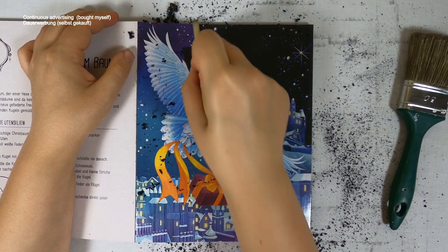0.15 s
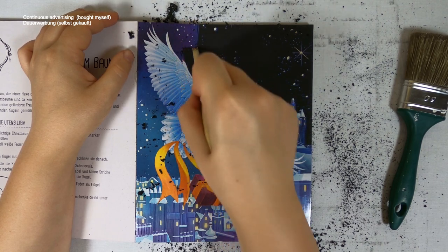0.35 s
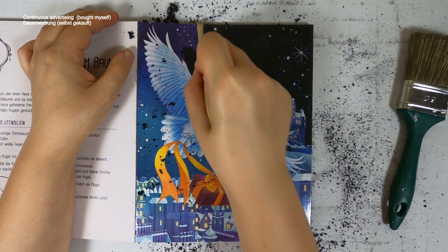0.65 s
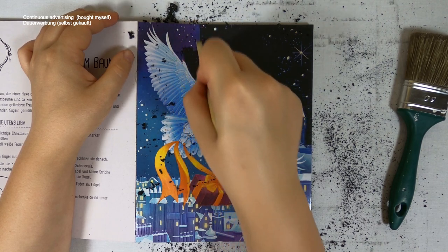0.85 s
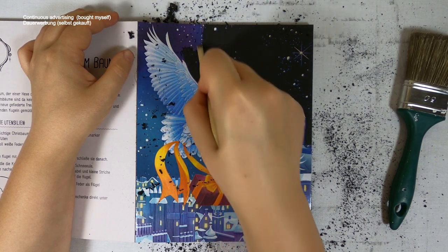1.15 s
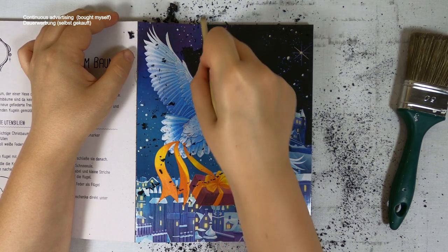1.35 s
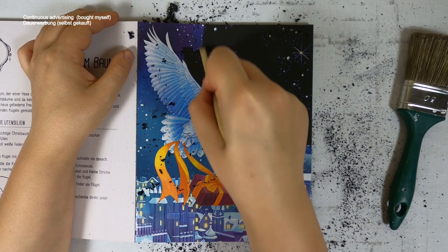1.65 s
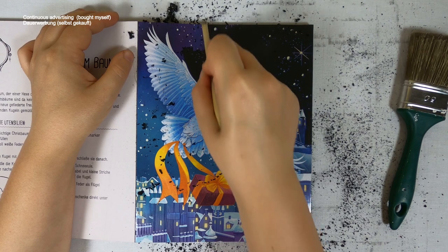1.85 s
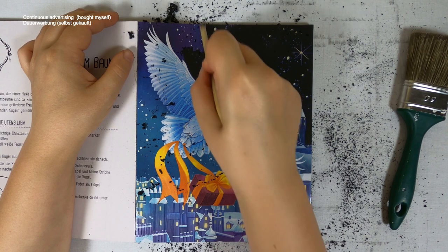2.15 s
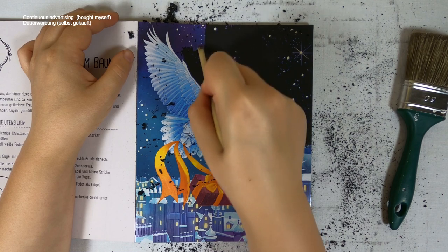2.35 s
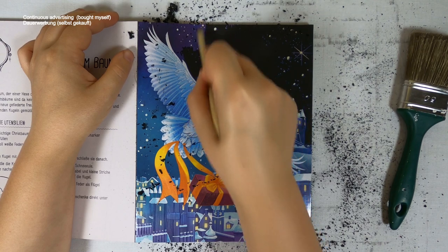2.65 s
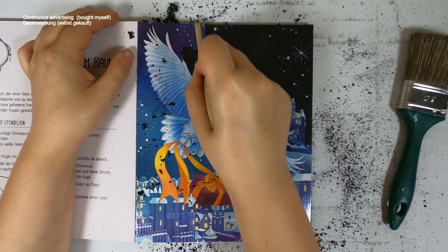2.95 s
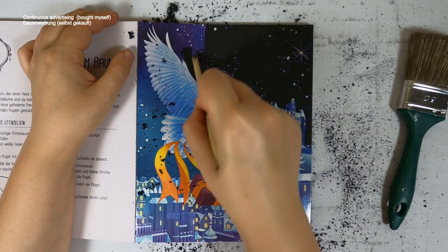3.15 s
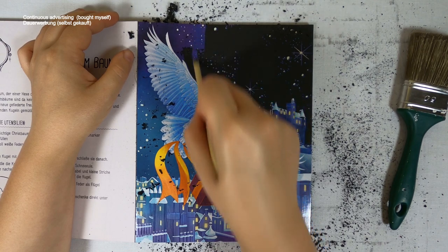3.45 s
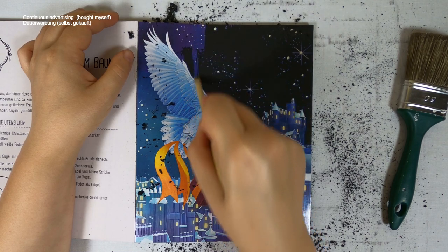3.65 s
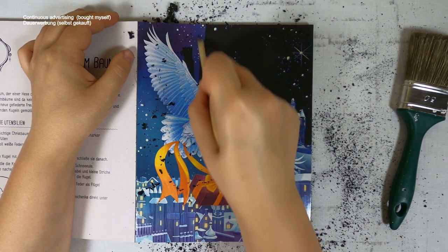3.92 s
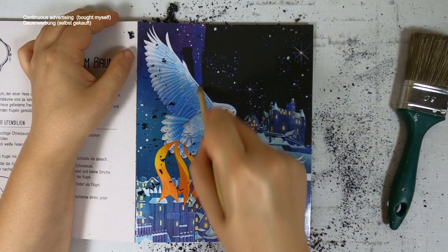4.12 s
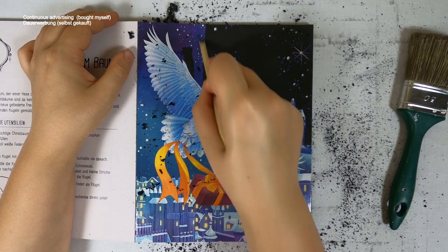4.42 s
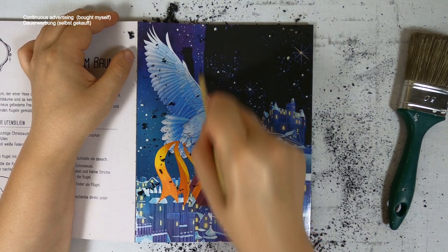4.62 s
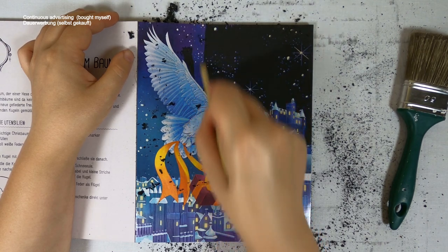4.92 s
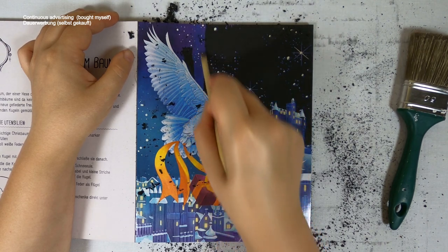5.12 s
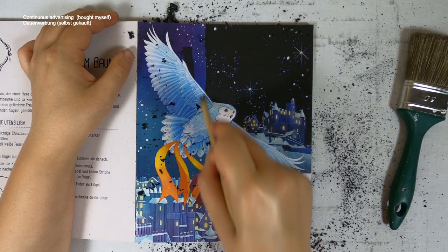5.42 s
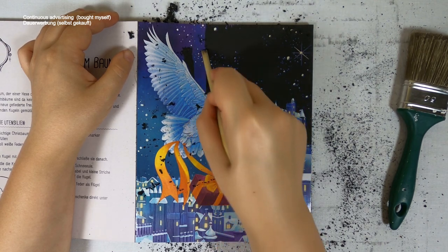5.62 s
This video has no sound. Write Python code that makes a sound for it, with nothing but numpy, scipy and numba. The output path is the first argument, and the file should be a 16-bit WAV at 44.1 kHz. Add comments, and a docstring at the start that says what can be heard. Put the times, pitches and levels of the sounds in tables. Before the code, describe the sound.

A wooden tip scrapes coating from a card page on a desk, close to a stereo microphone in a small room. Quick to-and-fro scratches rasp and chatter for two seconds, sink to faint touches, then return firmer and slower, with snapping catches, fine hiss and soft hand bumps beneath.

```python
"""Scratching a coated card

A wooden stylus scrapes the black coating off a card page on a desk, in quick strokes to and fro, in a small room.
In each stroke the tip grazes the page, and often bites into the coating, chattering at a gliding pitch; slips
of the tip and crumbling flakes feed a card ring, a rasp and a fine hiss, with sharp catches on top.
Below lie soft desk thuds and bumps from the hand, a deep rumble that comes and goes, and still air."""
import sys
import numpy as np
from scipy import signal
from scipy.fft import rfft, irfft, next_fast_len
from scipy.io import wavfile
from scipy.ndimage import uniform_filter1d
from numba import njit

SR = 44100
rng = np.random.default_rng(int(sys.argv[2]) if len(sys.argv) > 2 else 0)


def output_pcm(signal):
    """Save a mono or channel-first signal as 16-bit PCM at the path in sys.argv[1].

    Samples are clipped to [-1, 1] before scaling.
    """
    pcm = np.clip(np.atleast_2d(signal).T, -1, 1) * 32767
    wavfile.write(sys.argv[1], SR, np.round(pcm).astype(np.int16))


N = 254898
TIME = np.arange(N) / SR
# Filters work on a longer, silence-padded stretch, so that tails do not wrap round.
SIZE = next_fast_len(N + SR // 2, real=True) // 2 * 2
HZ = np.arange(SIZE // 2 + 1) * SR / SIZE

# Grazes from one turn of the hand to the next, before the layers' own trims:
# turn_s [s], level_db [dB], brightness_db [dB, added to rasp and hiss]
STROKES = [(-0.03, -73, -0.5), (0.116, -53, 5), (0.29, -53, 4), (0.512, -44.5, -3.5), (0.691, -49.5, 0),
           (0.91, -43.5, 1), (1.078, -47, 0), (1.303, -49.0, -3), (1.479, -52, 0), (1.726, -48.5, 4),
           (1.897, -55.5, 2.5), (2.126, -54.5, -4.0), (2.3, -69, 2), (2.461, -62.5, 4), (2.66, -83.5, 0.0),
           (2.852, -63.0, 6.5), (3.03, -61.0, 2), (3.269, -57, 5), (3.41, -60.5, 0.5), (3.705, -52.5, 12.5),
           (3.978, -58, -3), (4.276, -41.5, -7.5), (4.569, -63, 6), (4.864, -42.5, -6.5), (5.16, -55.5, 5),
           (5.464, -42, -9)]
# Bites of the tip into the coating, before the layers' own trims:
# start_s, end_s [s], level_db, swell_db (rise from start to end), rasp_db, hiss_db [dB],
# first_hz, middle_hz, last_hz [Hz, chatter pitch at start, middle and end]
BITES = [(-.01,0.038,-42.5,0.5,-10,-16.5,1320,1150,680), (0.12,0.181,-36,8.5,-11.5,-25.5,920,750,840),
         (0.334,0.382,-39.5,1,-10,-15.5,1600,1900,1400), (0.396,.435,-44,7.5,-10.5,-18,1960,1200,650),
         (0.517,0.567,-35.5,4,-12,-28,1130,890,1860), (0.743,0.836,-39.5,-1,-12,-18.5,2710,1550,570),
         (0.92,.982,-34,1.5,-13,-31,940,760,1330), (1.143,1.233,-39,-8.5,-10.5,-17.5,2570,1200,670),
         (1.307,1.322,-39,-19,-17,-25.5,1070,870,1100), (1.356,1.424,-48,-3,-10.5,-21.5,1320,1200,1200),
         (1.538,1.637,-42.5,0.5,-11,-17.5,2470,2050,690), (1.729,1.794,-32,2,-13,-27.5,1140,810,890),
         (1.941,1.972,-42.5,1,-9,-15,2330,2350,1150), (2.013,2.051,-43.5,2.5,-13.5,-20,1170,1200,520),
         (2.131,2.134,-36.5,5,-15,-25,1400,1400,1400), (2.168,2.229,-46.5,-3.5,-9,-22.5,1270,1330,1000),
         (2.34,2.403,-60.5,-4,-11.5,-16.5,1190,1040,900), (2.467,2.52,-55,-9,-20,-28,900,1030,920),
         (2.675,2.77,-63,-2,-5,-9.5,1510,800,900), (2.781,2.81,-53.5,-3,-9,-15.5,1500,1130,680),
         (2.864,2.895,-49.5,7,-19,-31,970,1000,800), (2.964,2.982,-65,-1,-4.5,-13,1200,1400,990),
         (3.027,3.06,-58,19,-6.5,-12.5,900,440,590), (3.137,3.198,-38.5,5.5,-12,-19.5,1930,1440,670),
         (3.273,3.31,-33.5,2.5,-16,-28,885,810,900), (3.49,3.628,-35,7.5,-11,-19,1840,880,785),
         (3.707,3.794,-33.5,10,-15.5,-34.5,830,830,880), (3.793,3.858,-31.5,-1,-10,-28,910,780,1060),
         (4.048,4.186,-36.5,12.5,-9.5,-17.5,1840,880,750), (4.33,4.361,-33,-4,-11,-24,1090,880,1300),
         (4.361,4.44,-33.5,0.5,-7.5,-25,2100,1900,1900), (4.638,4.697,-45,7,-8,-15,1420,1040,860),
         (4.727,4.792,-53,-2.5,-12.5,-17,850,740,950), (4.927,5.004,-37,-5,-8.5,-21.5,1260,3800,2000),
         (5.007,5.069,-36,-2.5,-7.5,-26,2900,1900,890), (5.204,5.327,-36,6,-10,-18,1620,850,750),
         (5.535,5.577,-35.5,-3,-14.5,-26.5,2400,4200,2900), (5.584,5.618,-43,0,-5.5,-20,1090,980,1700),
         (5.619,5.681,-34.5,0,-9,-26,2620,2130,860)]


def from_db(db):
    """Turns decibels into a plain gain."""
    return 10 ** (np.asarray(db) / 20)


def rms_one(x):
    """Scales a signal to an average strength (RMS) of 1."""
    return x / np.sqrt(np.mean(x ** 2) + 1e-20)


def evened(x, span_s):
    """Holds the running level near 1 and keeps the grain that is finer than the span."""
    power = np.mean(np.atleast_2d(x) ** 2, axis=0)
    size = max(int(span_s * SR), 8)
    smooth_power = uniform_filter1d(uniform_filter1d(power, size), size)
    return x / np.sqrt(np.abs(smooth_power) + 1e-12)


def in_time(rows):
    """Joins each column of (time in s, values ...) rows by straight lines."""
    s, *columns = np.transpose(sorted(map(tuple, rows)))
    return [np.interp(TIME, s, column) for column in columns]


def at_hz(points, hz):
    """Reads a curve of (Hz, value) points, with straight lines on a logarithmic pitch scale."""
    f, value = np.transpose(points)
    return np.interp(np.log(hz + 1), np.log(f), value)


def filtered(x, gain):
    """Multiplies each frequency by its gain."""
    return irfft(rfft(x, SIZE) * gain, SIZE)[..., :N]


def coloured(x, db):
    """Gives each frequency its level with a filter that never sounds early (minimum phase)."""
    cepstrum = irfft(np.log(from_db(db)), SIZE)
    cepstrum[1:SIZE // 2] *= 2
    cepstrum[SIZE // 2 + 1:] = 0
    return filtered(x, np.exp(rfft(cepstrum)))


def spread(pair):
    """Two unrelated signals become left and right, alike in the bass and less so in the treble."""
    # Left-right likeness: pitch_hz [Hz], likeness [0 to 1]
    likeness = [(100, .86), (700, .96), (1400, .95), (3100, .85), (6800, .65), (14000, .45)]
    alike = np.clip(at_hz(likeness, HZ), 0, .999)
    shared = filtered(pair[0], np.sqrt(1 + alike))
    opposed = filtered(pair[1], np.sqrt(1 - alike)) * [[1], [-1]]
    return shared + opposed


def noise(spectrum):
    """Steady stereo noise with the given spectrum and an RMS of 1."""
    return rms_one(coloured(spread(rng.standard_normal((2, N))), at_hz(spectrum, HZ)))


def still_air():
    """The quiet room's air is a faint steady noise."""
    # Spectrum of the air: pitch_hz [Hz], level_db [relative dB]
    air_spectrum = [(12, -28), (20, -36), (92, -44), (166, -4), (534, -9), (725, -5.5), (811, -34),
                    (1040, -9.5), (1870, -19.5), (5380, -28.5), (6540, -26.5), (12400, -33), (15500, -85)]
    return from_db(-68.5) * noise(air_spectrum)


def rumble():
    """A deep noise swells and sinks below the scraping."""
    # Spectrum of the rumble: pitch_hz [Hz], level_db [relative dB]
    rumble_spectrum = [(12, -7), (30, 31.5), (50, 20), (80, -3), (130, -51)]
    # Rumble over time, before the trim below: time_s [s], level_db [dB]
    rumble_level = [(0.0, -59), (0.42, -71), (0.53, -63), (0.61, -86), (0.64, -55.5), (0.85, -81),
                    (1.01, -53), (1.27, -90), (1.45, -59), (1.72, -88), (1.82, -65), (2.62, -76),
                    (2.7, -54), (2.77, -73), (4.41, -78), (4.46, -60), (4.64, -79), (5.78, -85)]
    level_db = in_time(rumble_level)[0] - 2.1
    return from_db(level_db) * evened(noise(rumble_spectrum), span_s=0.073)


def thuds(arch):
    """The hand's weight makes the desk thud softly: low noise that swells with each stroke."""
    # Spectrum of the thudding: pitch_hz [Hz], level_db [relative dB]
    thud_spectrum = [(60, -18.5), (105, -31.5), (140, -8.5), (168, 2.5), (205, -17), (300, -2.5),
                     (380, -17.5), (600, -49.5)]
    # Thudding at the height of a stroke: time_s [s], level_db [dB]
    hand_weight = [(0, -60.5), (1.8, -59), (2.35, -69), (3.2, -62), (4.2, -65.5), (5.78, -64.5)]
    share_at_turn = 0.29  # of the gain, which stays while the hand turns
    swell = share_at_turn + (1 - share_at_turn) * arch
    return from_db(in_time(hand_weight)[0]) * swell * evened(noise(thud_spectrum), span_s=0.086)


def bumps(soft_s):
    """The soft edge of the hand sets the desk's low modes ringing."""
    # Bumps of the hand: time_s [s], level_db [dB, before the modes' own levels]
    hand_bumps = [(0.144, -58), (0.222, -48.5), (0.413, -58), (.625, -51), (0.836, -60), (1.008, -45.5),
                  (1.13, -46.5), (1.408, -48), (1.528, -52.5), (1.761, -52.5), (1.841, -52), (1.952, -56),
                  (2.06, -66), (2.141, -62), (2.467, -62), (2.59, -61), (2.705, -57), (2.974, -62),
                  (3.057, -52), (3.83, -49), (4.435, -47.5), (4.885, -59), (5.661, -60)]
    # Ringing modes of the desk: pitch_hz [Hz], level_db [relative dB], t60_s [s to fall by 60 dB]
    desk_modes = [(71.5, -7.5, 0.11), (147, 4, 0.17), (169.9, 6, 0.21), (311.5, -0.5, 0.13)]
    t = TIME[:SR // 3]
    blows = np.zeros(N)
    for s, db in hand_bumps:
        blows[round(s * SR)] = from_db(db)
    ring = sum(from_db(db - 60 * t / t60) * np.sin(2 * np.pi * hz * t) for hz, db, t60 in desk_modes)
    soft_onset = 1 - np.exp(-t / soft_s)
    return signal.fftconvolve(blows, ring * soft_onset)[:N]


def desk(arch):
    """Thuds in step with the strokes, the deep rumble and the hand's bumps add up."""
    return thuds(arch) + rumble() + bumps(soft_s=0.011)


def unit_energy(echoes):
    """Scales the echoes of each side to a total energy of 1."""
    return echoes / np.sqrt(np.sum(echoes ** 2, axis=1, keepdims=True))


def room(x, first_s, treble_db):
    """Dense reflections, less alike at the two sides towards the treble, die away quickly."""
    level_db, t60_s = -9, 0.22
    t = TIME[:SR // 2]
    dense = spread(rng.standard_normal((2, N)))[:, :len(t)]
    echoes = unit_energy(dense * from_db(-60 * t / t60_s) * (t > first_s))
    wet = signal.fftconvolve(x, echoes, axes=1)[:, :N]
    return coloured(wet, level_db + at_hz([(1200, 0.011), (6000, treble_db)], HZ))


def glances(x, decay_s, level_db):
    """Treble glances off the desk and the hand within a few milliseconds, which combs it finely."""
    t = TIME[:SR // 50]
    echoes = unit_energy(rng.standard_normal((2, len(t))) * np.exp(-t / decay_s))
    reflected = signal.fftconvolve(x, echoes, axes=1)[:, :N]
    return x + coloured(reflected, level_db + at_hz([(1200, -18), (4500, 0)], HZ))


def grazes():
    """Each stroke rises and falls in one early-peaking arch; returns it and the gains of ring, rasp and hiss."""
    last_turn_s = 5.793
    skew, steepness = 0.65, 1.93
    rasp_db, hiss_db = -12, -18.5  # beside the card's ring
    turns, level_db, bright_db = np.transpose(STROKES)
    stroke = np.clip(np.searchsorted(turns, TIME, "right") - 1, 0, None)
    length_s = np.diff(turns, append=last_turn_s)
    progress = np.clip((TIME - turns[stroke]) / length_s[stroke], 0, 1)
    arch = np.abs(np.sin(np.pi * progress ** skew)) ** steepness
    layers_db = level_db + np.array([0 * bright_db, bright_db + rasp_db, bright_db + hiss_db])
    shapes = np.array([arch, arch, arch ** 0.82])  # the hiss has a flatter arch
    return arch, shapes * from_db(layers_db)[:, stroke]


def bites():
    """Each bite sets in quickly, swells or fades evenly and lets go; returns the gains of ring, rasp and hiss."""
    attack_s, release_s = 0.013, .012
    power = np.zeros((3, N))
    for start, end, level_db, swell_db, rasp_db, hiss_db, *_ in BITES:
        near = slice(*np.searchsorted(TIME, [start, end + 10 * release_s]))
        t = TIME[near]
        progress = np.clip((t - start) / (end - start), 0, 1)
        hold = from_db(level_db + swell_db * (progress - .5))
        attack = np.minimum((t - start) / attack_s, 1)
        release = np.exp(-np.maximum(t - end, 0) / release_s)
        gain = hold * attack * release
        power[:, near] += (from_db([[0], [rasp_db], [hiss_db]]) * gain) ** 2
    return np.sqrt(power)


def chatter_pitch():
    """The chatter has one set pitch at every turn and glides through three pitches in each bite."""
    turn_hz = 780
    points = [(turn, turn_hz) for turn, *_ in STROKES]
    for start, end, *_, first_hz, middle_hz, last_hz in BITES:
        points += [(start, first_hz), ((start + end) / 2, middle_hz), (end, last_hz)]
    return np.exp(in_time([(s, np.log(hz)) for s, hz in points])[0])


def slips(median_gap_s, uneven, size_db):
    """Stick and slip: clicks at uneven gaps, on the whole larger the longer the tip has stuck."""
    draws = rng.standard_normal((6000, 2))
    stuck = np.exp(uneven * draws[:, 0])
    at = (np.cumsum(stuck) * SR * median_gap_s).astype(int)
    size = np.sqrt(stuck) * from_db(size_db * draws[:, 1])
    inside = at < N
    return np.bincount(at[inside], size[inside], N)


def crumbs(slip, burst_s, steady):
    """Countless flakes of coating break off, most strongly just after each slip."""
    burst = rms_one(signal.lfilter([1], [1, -np.exp(-1 / (burst_s * SR))], slip))
    return rms_one(spread(rng.standard_normal((2, N)) * (steady + burst)))


@njit
def gliding_ring(x, hz, q, sr):
    """A resonance whose centre moves; its gain is 1 at the centre."""
    out, band, low = np.zeros(len(x)), 0., 0.
    for i in range(len(x)):
        g = np.tan(np.pi * hz[i] / sr)
        v = (band + g * (x[i] - low)) / (1 + g * (g + 1 / q))
        band, low = 2 * v - band, low + 2 * g * v
        out[i] = v / q
    return out


def chatter(slip, grit, pitch_hz, grit_share):
    """Slips and flakes keep the tip shaking steadily at a rough, gliding pitch."""
    push = rms_one(signal.lfilter([1, -1], [1, -.98], slip)) + grit_share * grit
    ring = np.array([gliding_ring(side, pitch_hz, q=4., sr=SR) for side in push])
    return evened(ring, span_s=.008)


def catches(rise_s, crack_db, crack_s):
    """The tip catches and snaps free: a short swell of the card's ring and a crack of breaking coating."""
    # Catches: time_s [s], level_db [dB], pitch_hz [Hz]
    hard_catches = [(0.022, -33.5, 1008), (0.133, -39, 770), (0.337, -51, 1130), (0.421, -33.5, 1130),
                    (0.524, -28, 1040), (0.542, -27, 1010), (0.748, -41.5, 1080), (0.919, -30, 1040),
                    (1.742, -25, 962), (2.131, -39.5, 1250), (2.186, -34, 1056), (3.157, -32.5, 1090),
                    (3.176, -32, 1010), (3.306, -24.5, 953), (3.562, -27, 1010), (3.717, -26.5, 794),
                    (3.786, -26, 935), (3.841, -32.5, 915), (4.356, -23, 1050), (4.653, -45, 1100),
                    (4.935, -24.5, 1056), (5.539, -30.5, 855), (5.675, -22, 1017)]
    out = np.zeros(N + SR)
    t = TIME[:SR // 20]
    lowpass = signal.butter(2, 5000, fs=SR)
    for s, db, hz in hard_catches:
        ring = t / rise_s * np.exp(1 - t / rise_s) * np.sin(2 * np.pi * hz * t)
        crack = signal.lfilter(*lowpass, rng.standard_normal(len(t))) * np.exp(-t / crack_s)
        at = max(round(s * SR), 0)
        out[at:at + len(t)] += from_db(db) * (ring + from_db(crack_db) * crack)
    return out[:N]


def stylus(graze):
    """The same slips drive card ring, rasp and hiss; a faster chatter brings more rasp and hiss."""
    # Spectra of the card's ring, the rasp, the hiss, the ring near 2.85 kHz and the finer hiss:
    # pitch_hz [Hz], level_db [relative dB]
    card_spectrum = [(200, -34), (400, -14.5), (560, -8), (700, 4.5), (1100, 6.5), (1400, -1.5),
                     (1800, -10.5), (3000, -27.5), (12000, -85)]
    rasp_spectrum = [(910, -26.5), (1410, 4), (1710, 3), (2310, 0.5), (2950, -5), (4350, -4.5), (5500, -4),
                     (7000, -12), (10000, -33), (15400, -63)]
    hiss_spectrum = [(2100, -21.5), (3600, -15), (5200, 13), (6300, 7.5), (7300, 3.5), (8100, -1.5),
                     (9200, -7), (11200, -14.5), (12700, -17.5), (14100, -18.5), (15400, -31)]
    high_ring_spectrum = [(2400, -15), (2850, -0.5), (3300, -12)]
    finer_hiss_spectrum = [(7500, -22), (9000, -5), (11000, 0), (12500, -1), (14500, -16)]
    # Narrow resonances and gaps of the page lying on the desk: pitch_hz, width_hz [Hz], level_db [dB]
    page_modes = [(749, 16.6, 8), (794.5, 34, -11.5), (770, 20, -3.5), (886, 63, -8.5), (1062, 52, 1.5),
                  (1233, 160, -6), (1329, 16, 4.5), (1421, 20, -12), (1686, 25, 2.5), (1770, 23, 5),
                  (1936, 134, -4.5), (2036, 320, 5), (2533, 82, 4), (2805, 340, -4), (3324, 290, 3.5),
                  (3870, 93, -3), (4670, 160, -6.5)]
    # Early on a ring near 2.85 kHz is strong; later it fades and a finer hiss grows:
    # time_s [s], high_ring_db, finer_hiss_db [dB, beside the grit]
    treble_levels = [(0, 15, -33), (1.8, 9, -23), (3.3, 3, -6), (4.2, -27, 1), (5.3, -22, 10),
                     (5.55, -25, 5)]
    card_hz = 880  # the card rings most when the chatter passes this pitch

    pitch_hz = chatter_pitch()
    octaves = np.log2(pitch_hz / card_hz)
    contact = np.hypot(graze, bites())
    high_ring_db, finer_hiss_db = in_time(treble_levels)
    page_db = sum(db / (1 + (2 * (HZ - hz) / width) ** 2) for hz, width, db in page_modes)

    slip = slips(median_gap_s=1 / 260, uneven=.65, size_db=3.0)
    grit = crumbs(slip, burst_s=0.0032, steady=1.0)
    shake = chatter(slip, grit, pitch_hz, grit_share=0.66)
    high_ring = from_db(high_ring_db) * coloured(grit, at_hz(high_ring_spectrum, HZ))
    finer_hiss = from_db(finer_hiss_db) * filtered(grit, from_db(at_hz(finer_hiss_spectrum, HZ)))

    # Each layer: source, spectrum, and its trim in dB plus a change in dB per octave of chatter pitch
    layers = [(shake + from_db(6.5) * grit, card_spectrum, -.3 - 4.5 * np.abs(octaves)),
              (grit + high_ring + from_db(-12) * shake, rasp_spectrum, 1.23 + 3.5 * octaves),
              (grit + finer_hiss, hiss_spectrum, 4.0 + 3 * octaves)]
    scrape = 0
    for gain, (source, spectrum, trim_db) in zip(contact, layers):
        texture = evened(coloured(source, at_hz(spectrum, HZ) + page_db), span_s=0.015)
        scrape = scrape + gain * from_db(trim_db) * texture
    return scrape


def scene():
    """The scraping with its reflections, over the desk's low sounds and the still air."""
    arch, graze = grazes()
    tip = stylus(graze) + catches(rise_s=0.0019, crack_db=-22, crack_s=0.0024)
    scrape = glances(tip, decay_s=0.003, level_db=0.5)
    reflections = room(scrape, first_s=0.0021, treble_db=-6.0)
    return scrape + reflections + desk(arch) + still_air()


def record(dry):
    """The right side leads in phase, the sides differ in tone, and the top is cut above 15.5 kHz."""
    # Level difference of the sides: pitch_hz [Hz], left_minus_right_db [dB]
    balance = [(100, -.4), (700, 0), (1300, .2), (2400, 2.3), (4400, .8), (8000, -1.3), (15000, -2.5)]
    # Phase by which the right side leads: pitch_hz [Hz], lead_rad [radians]
    right_lead = [(100, 0), (1000, .2), (1700, .4), (2700, .8), (4500, .8), (7000, 1.3), (14000, 1.7)]
    tilt_db = at_hz(balance, HZ) / 2
    left = filtered(dry[0], from_db(tilt_db) * np.exp(-1j * at_hz(right_lead, HZ)))
    right = filtered(dry[1], from_db(-tilt_db))
    top_cut = signal.ellip(12, .1, 80, 15500, fs=SR, output="sos")
    return signal.sosfilt(top_cut, [left, right])


dry = scene()
out = record(dry)
output_pcm(out)
```